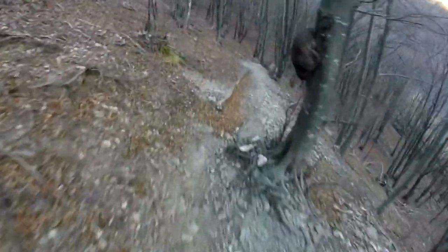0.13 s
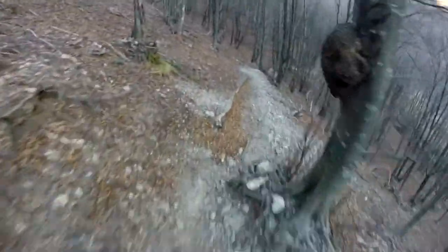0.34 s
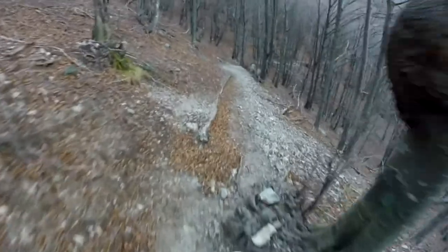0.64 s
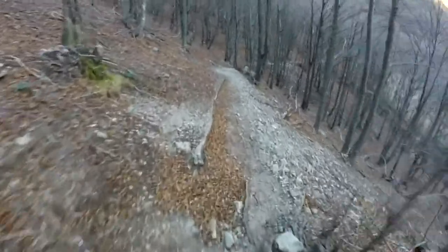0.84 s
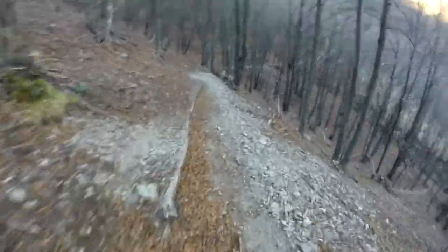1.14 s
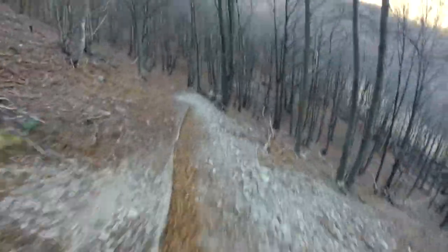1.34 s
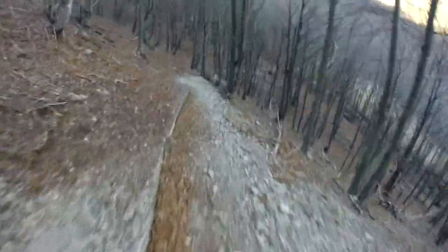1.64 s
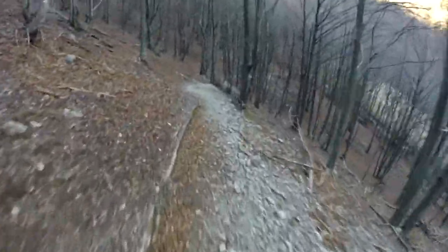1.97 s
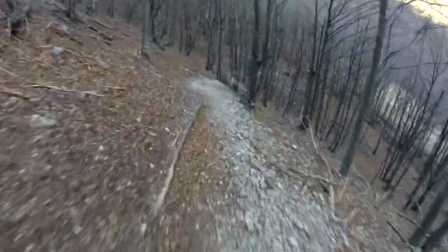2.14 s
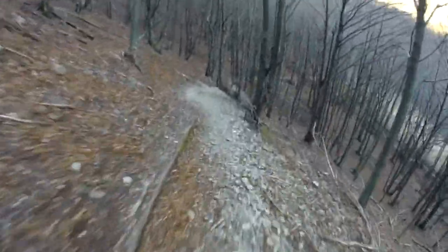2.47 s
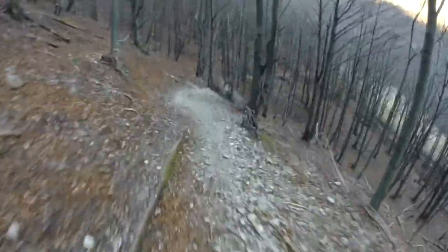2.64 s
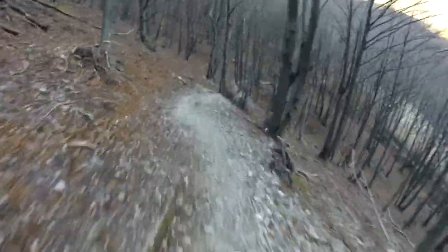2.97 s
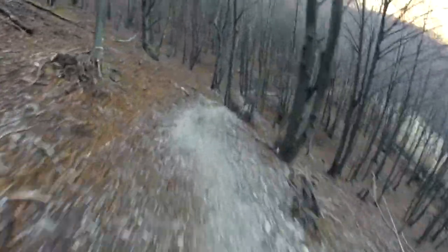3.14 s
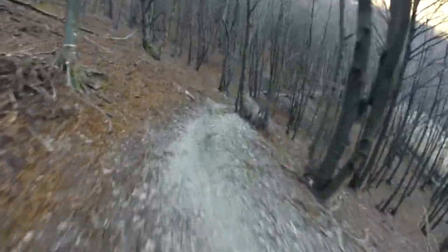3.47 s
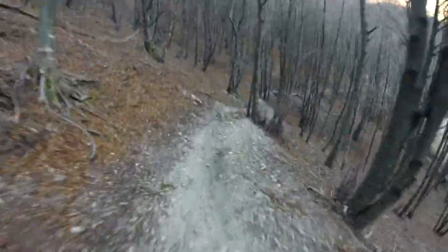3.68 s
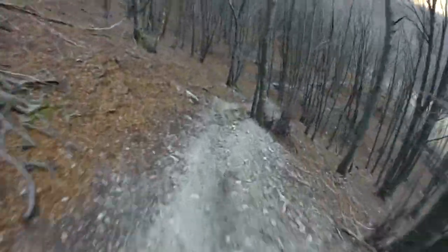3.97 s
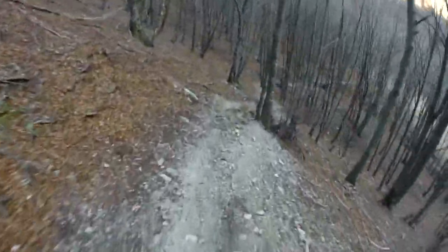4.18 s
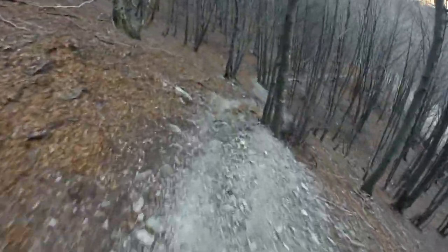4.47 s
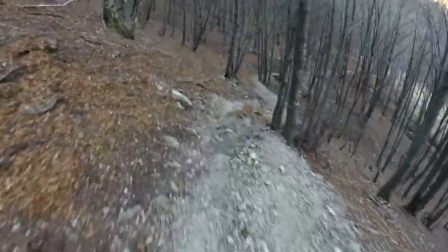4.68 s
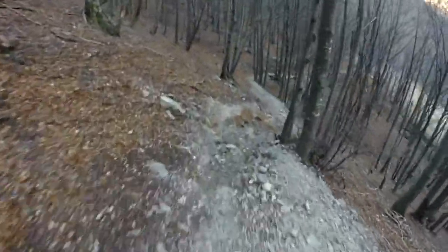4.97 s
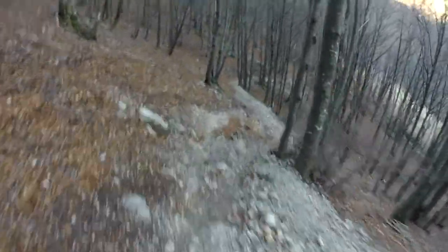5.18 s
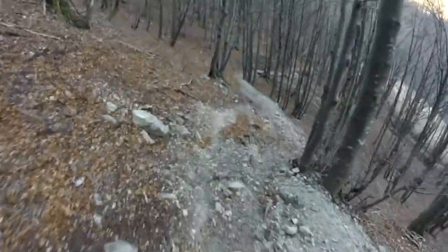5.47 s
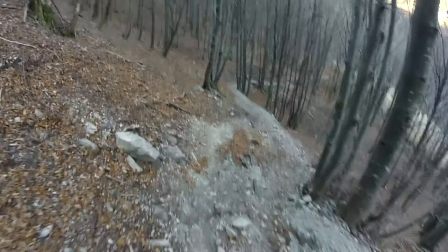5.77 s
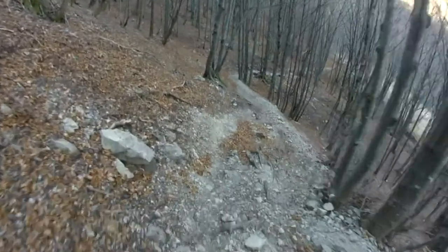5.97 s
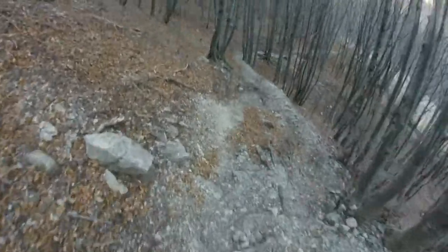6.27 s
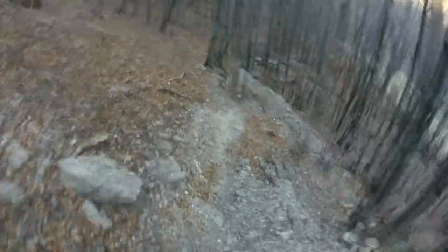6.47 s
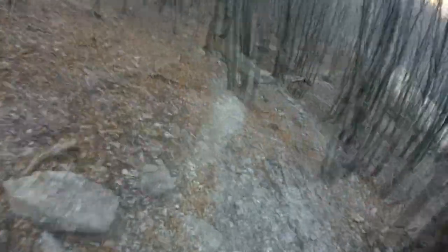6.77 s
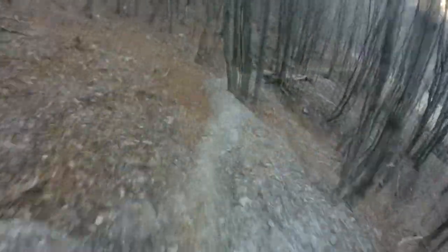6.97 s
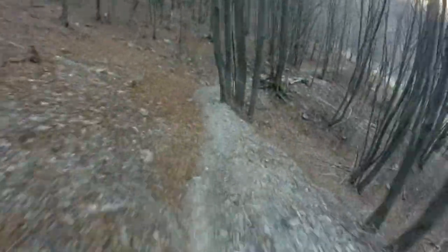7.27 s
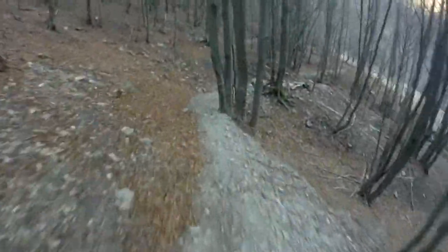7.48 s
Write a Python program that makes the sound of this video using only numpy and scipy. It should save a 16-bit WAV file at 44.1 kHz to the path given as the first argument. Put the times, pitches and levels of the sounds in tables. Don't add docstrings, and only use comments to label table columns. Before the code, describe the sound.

Low, throbbing wobble from a shaking camera mount runs throughout, with sudden heavy bumps. Over it, irregular dry clacks, short chattering knocks of stones and chain, and tiny metallic-bright ticks sound very close and boxy inside a plastic housing. Tyres hiss faintly on grit outdoors, with muffled air. A hard wheel landing hits near four seconds; after six it becomes sparser, then bumps return at the end.

```python
import sys
import numpy as np
from scipy import signal
from scipy.fft import rfft, irfft, next_fast_len
from scipy.io import wavfile
from scipy.ndimage import map_coordinates

SR = 44100
rng = np.random.default_rng(int(sys.argv[2]) if len(sys.argv) > 2 else 0)


def ratio_of_db(decibels):
    return 10 ** (np.asarray(decibels, float) / 20)


def digitize_waveform(pressure):
    field = np.atleast_2d(pressure).T
    bounded = np.clip(field, -1, 1)
    quanta = np.round(bounded * 32767).astype(np.int16)
    wavfile.write(sys.argv[1], SR, quanta)


N = 336042

# (time [s], level [dB])
ROUGHNESS = [(0.0, 2), (0.36, -1), (1.0, 1), (1.29, 4), (1.5, 2.5), (2.0, -1.5), (2.33, 0), (2.6, 4),
             (3.2, 1), (3.46, 1.5), (3.86, 3.5), (4.01, 0), (4.9, 0), (5.28, 2.5), (5.56, -4), (5.86, -1),
             (6.68, -6), (7.62, -1.5)]


def unit(x):
    return x / np.sqrt(np.mean(x ** 2) + 1e-20)


def curves(rows):
    s, *cols = np.transpose(rows)
    return [np.interp(np.arange(N) / SR, s, c) for c in cols]


def wobble(rate):
    knots = rng.standard_normal(int(N * rate / SR) + 4)
    return map_coordinates(knots, [np.arange(N) * rate / SR])


def swells(rows):
    t = np.arange(N) / SR
    return sum(db * np.exp(-((t - s) / max(length, 0.01)) ** 2) for s, db, length in rows)


def filtered(x, response):
    m = next_fast_len(len(x) + 8192)
    spectrum = rfft(x, m) * response(np.fft.rfftfreq(m, 1 / SR))
    return irfft(spectrum, m)[:len(x)]


def coloured(x, points):
    hz, db = np.transpose(points)
    return unit(filtered(x, lambda f: ratio_of_db(np.interp(np.log(f + 1), np.log(hz + 1), db))))


def add(track, s, sound):
    part = track[round(s * SR):][:len(sound)]
    part += sound[:len(part)]


def upper_fall(f):
    return 1 / (1 + (f / 4500) ** 10)


def housing(f):
    # (frequency [Hz], width [Hz], level [dB])
    resonances = [(1320, 300, -32), (1380, 560, -26.5), (1914, 285, 2), (2650, 333, 0), (2924, 170, 3.5),
                  (3695, 290, -2), (4160, 710, -10)]
    total = 0
    for k, (hz, width, db) in enumerate(resonances):
        total = total + (-1) ** k * ratio_of_db(db) * 1j * f * width / (hz * hz - f * f + 1j * f * width)
    return total * upper_fall(f)


def ring(modes, t, attack, scatter_db):
    tones = 0
    for k, (hz, db, t60) in enumerate(modes):
        strength = ratio_of_db(db + scatter_db * rng.standard_normal() - 60 * t / t60)
        tones = tones + (-1) ** k * strength * np.sin(2 * np.pi * hz * t)
    return tones * (1 - np.exp(-t / attack))


def grit(rate, spread_db):
    sizes = ratio_of_db(spread_db * np.minimum(rng.exponential(size=N), 2.5))
    hits = (rng.random(N) < rate / SR) * sizes
    return 1 + np.convolve(hits, np.exp(-np.arange(200) / 45))[:N]


def electronics():
    # (frequency [Hz], level [dB rms])
    circuit_tones = [(12662, -95), (14761, -97), (14998, -96)]
    # (frequency [Hz], level [dB per Hz])
    floor_colour = [(3500, -22), (6000, -6), (8350, -6.5), (13400, -7.5), (14700, -9), (15700, -12),
                    (15900, -50)]
    t = np.arange(N) / SR
    out = ratio_of_db(-77.5) * coloured(rng.standard_normal(N), floor_colour)
    for hz, db in circuit_tones:
        out += np.sqrt(2) * ratio_of_db(db) * np.sin(2 * np.pi * hz * t + 1.5 * wobble(12))
    return out


def ride():
    # (time [s], hiss rise [dB], length [s])
    skids = [
        (1.32, 10, .09),
        (2.61, 1, 0.22),
        (2.95, 4, 0.064),
        (5.16, 4.5, 0.042),
    ]
    # (time [s], rise [dB], length [s])
    gusts = [
        (1.44, 1, 0.088),
        (5.28, 3.5, 0.063),
        (5.76, 3.5, 0.098),
    ]
    # (frequency [Hz], level [dB per Hz])
    hiss_colour = [(2500, -16.5), (4300, -4.5), (5700, -4), (6300, -9.5), (7150, -6.5), (7800, -12.5),
                   (10700, -16.5), (14000, -24), (15700, -28), (15900, -70)]
    # (frequency [Hz], level [dB per Hz])
    air_colour = [(71, -9.5), (120, -2.5), (156, -8.5), (321, -8.5), (1340, -18.5), (1500, -16),
                  (1950, -60), (3300, -120)]
    rough_db, = curves(ROUGHNESS)
    bumpy = wobble(16)
    rattle_db = -58 + rough_db + 1.8 * bumpy + 1.57 * wobble(60)
    hiss_db = -68 + 0.6 * rough_db + swells(skids) + 0.72 * bumpy + 1.3 * wobble(40)
    air_db = -58.5 + 0.51 * rough_db + swells(gusts) + 0.61 * bumpy + 1.64 * wobble(25)
    rattle = unit(filtered(grit(rate=190, spread_db=4.0) * rng.standard_normal(N), housing))
    hiss = coloured(grit(rate=130, spread_db=0.0) * rng.standard_normal(N), hiss_colour)
    air = coloured(rng.standard_normal(N), air_colour)
    return ratio_of_db(rattle_db) * rattle + ratio_of_db(hiss_db) * hiss + ratio_of_db(air_db) * air


def latch_ticks():
    # (time [s], peak level [dB])
    tick_events = [(0.2143, -46), (0.61, -40.5), (0.7572, -42), (0.997, -39.5), (1.1623, -40.5),
                   (1.2441, -44), (1.3457, -45), (1.5783, -39.5), (1.6424, -40.5), (2.0752, -45),
                   (2.4767, -41.5), (2.5446, -49), (2.646, -44), (2.7544, -38.5), (3.017, -41),
                   (3.9986, -39.5), (4.3184, -42), (4.5533, -46), (4.8045, -50), (5.0674, -44.5),
                   (5.222, -40.5), (5.3073, -41), (5.7828, -38.5), (6.0823, -48), (6.5412, -40.5),
                   (7.004, -50), (7.0723, -48), (7.2993, -44.5), (7.3588, -42.5), (7.4088, -49.5)]
    # (frequency [Hz], level [dB], t60 [s])
    latch_modes = [(3460, -5, 0.0062), (7140, -4, 0.0036), (9740, 0.5, 0.0025), (12000, -12, 0.0032),
                   (15300, -4, 0.0026)]
    lead_s, bounce_s = 0.0008, 0.0021
    knock_hz, knock_t60_s = 745, 0.014
    out, t = np.zeros(N), np.arange(900) / SR
    for s, db in tick_events:
        add(out, s + lead_s, ratio_of_db(db + 1.5) * ring(latch_modes, t, attack=0.0001, scatter_db=0.5))
        add(out, s + bounce_s, ratio_of_db(db - 12.5) * ring(latch_modes, t, attack=0.0001, scatter_db=9))
        knock_db = -40.5 + 0.58 * (db + 43)
        knock = ratio_of_db(knock_db - 60 * t / knock_t60_s) * np.sin(2 * np.pi * knock_hz * t)
        add(out, s + lead_s, knock)
    return out


def jolt(db, t60, centre_hz, edge, thud, slam_colour, thud_colour):
    t = np.arange(8000) / SR
    noise = rng.standard_normal((2, len(t)))
    contacts = noise[0] * (rng.random(len(t)) < 700 / SR)
    contacts[40] = 1.62
    drive = unit(contacts) + 0.62 * noise[1]

    def lean(f):
        return housing(f) * (0.4 + 1 / (1 + ((f - centre_hz) / 330) ** 2))

    edge_db, edge_loss = edge
    thud_db, thud_loss = thud
    above_db = db + 35
    sound = unit(filtered(drive, lean))
    sound += ratio_of_db(edge_db - edge_loss * above_db) * coloured(drive, slam_colour)
    sound += ratio_of_db(thud_db - thud_loss * above_db) * coloured(drive, thud_colour)
    return ratio_of_db(db - 9 - 60 * t / max(t60, 0.01)) * (1 - np.exp(-t / 0.001)) * sound


def jolts():
    # (time [s], peak level [dB], t60 [s])
    stones = [(0.2739, -40.5, 0.15), (0.6711, -40, 0.068), (0.8196, -33.5, .042), (0.955, -40, 0.074),
              (0.987, -34.5, 0.076), (1.08, -39, .1), (1.1375, -37, 0.068), (1.756, -29.5, 0.054),
              (2.1305, -37, 0.05), (2.9964, -35, 0.096), (3.077, -24.5, 0.024), (3.586, -34, 0.057),
              (3.7294, -42, 0.095), (4.0781, -37.5, 0.049), (4.2342, -38, .07), (4.4896, -38.5, 0.22),
              (4.658, -37, 0.15), (4.797, -35, 0.079), (4.8898, -36, 0.074), (5.1371, -30, 0.14),
              (6.4185, -37, 0.089), (7.025, -43, 0.085), (7.105, -42, 0.053), (7.565, -41, .05)]
    # (time [s], peak level [dB], t60 [s], centre [Hz])
    slaps = [(1.1655, -27, 0.03, 2800), (1.1872, -19, 0.043, 1800), (1.7853, -37.5, .061, 2900),
             (1.839, -40, .06, 2600), (2.382, -37, 0.049, 2930), (2.6648, -37, 0.16, 2905),
             (2.9319, -40.5, 0.32, 2650), (3.709, -40, 0.061, 2750), (3.7903, -38, .07, 2880),
             (3.7949, -28, .1, 3250), (3.8333, -39, 0.055, 3040), (3.973, -37, 0.076, 2790),
             (4.9262, -40, .1, 2700), (4.9665, -29.5, 0.079, 2940), (4.9916, -31.5, 0.064, 2724),
             (5.145, -20, .044, 2670), (5.1792, -38, 0.062, 2935), (5.347, -35.5, 0.06, 3050),
             (5.3916, -33.5, .048, 3130), (5.657, -37, 0.055, 2910), (5.6694, -34, 0.057, 2980),
             (6.3858, -40, 0.2, 3030), (6.765, -45, 0.24, 2660), (6.8577, -34, 0.064, 2500),
             (7.1726, -30.5, 0.087, 2942), (7.1825, -50, 0.093, 2900), (7.233, -29.5, 0.045, 2450),
             (7.5086, -36, 0.037, 2520), (7.612, -33.5, 0.042, 2630)]
    # (time [s], peak level [dB], t60 [s], centre [Hz])
    landings = [
        (0.066, -30.5, 0.038, 1930),
        (3.244, -37.5, .046, 2130),
        (3.902, -20, 0.095, 2570),
        (5.7077, -34, 0.19, 1740),
        (6.55, -28, .07, 2920),
        (6.5575, -28.5, 0.051, 1840),
        (6.8244, -35, 0.16, 2270),
    ]
    # (frequency [Hz], level [dB per Hz])
    slam_colour = [(4300, 1.5), (5600, 1.5), (7400, -8.5), (8500, -27), (12000, -30), (15500, -40),
                   (16000, -80)]
    # (frequency [Hz], level [dB per Hz])
    thud_colour = [(600, -35), (900, -4.5), (1230, -2.5), (1500, -4), (1800, -41)]
    stones = [(*row, 2020) for row in stones]
    # (level [dB], loss [dB per dB of jolt])
    kinds = [(stones, (-17, 0), (-18.5, 0.9)),
             (slaps, (-16, 1.12), (-23, 0)),
             (landings, (-10, 0.2), (-19.5, -0.2))]
    out = np.zeros(N)
    for rows, edge, thud in kinds:
        for s, db, t60, centre_hz in rows:
            add(out, s - 0.001, jolt(db, t60, centre_hz, edge, thud, slam_colour, thud_colour))
    return out


def housing_clacks():
    # (time [s], peak level [dB], brightness [dB])
    clack_events = [(1.1936, -17.5, -26.5), (1.395, -21, -38), (1.6155, -19, -26), (1.8578, -22.5, -32.5),
                    (2.362, -19, -31.5), (2.607, -18, -25.5), (2.6956, -18.5, -26), (2.766, -32.5, -32),
                    (3.1253, -20, -31), (3.6584, -17.5, -28.5), (4.0174, -19.5, -29), (4.2041, -28.5, -47),
                    (4.337, -22.5, -37), (5.1465, -17, -26), (5.2802, -31, -36), (5.7368, -17.5, -31),
                    (6.1914, -24, -26.5), (6.836, -28, -30)]
    # (frequency [Hz], level [dB], t60 [s])
    low_modes = [(357, -26.5, 0.039), (1960, -8, 0.0032), (2650, 3.5, 0.0037), (3220, -24, 0.0057),
                 (3743, -11, 0.0065), (4100, -15.5, 0.0059)]
    # (frequency [Hz], level [dB], t60 [s])
    high_modes = [(5230, -9, 0.0083), (6570, -9.5, 0.013), (7380, -7, 0.012), (8170, -16, 0.0068),
                  (9500, -16, .005), (11140, -15, 0.0062), (14003, -22, .005)]
    rebound_s, rise_s = 0.00113, 0.0007
    body, bright, t = np.zeros(N), np.zeros(N), np.arange(2000) / SR
    for s, db, top_db in clack_events:
        first = s - 0.0003
        second = first + rebound_s
        level = ratio_of_db(db + 4.5)
        top = ratio_of_db(db + top_db + 9.5) * ring(high_modes, t, attack=0.00027, scatter_db=4.0)
        buzz = ratio_of_db(-19.5 - 60 * t / 0.033) * unit(filtered(rng.standard_normal(len(t)), housing))
        add(body, first, level * ring(low_modes, t, rise_s, scatter_db=2.0))
        add(body, second, level * (ring(low_modes, t, rise_s / 2, scatter_db=2.0) + buzz))
        add(bright, first, top)
        add(bright, second, 0.82 * top)
    return filtered(body, upper_fall) + bright


def mount_release(f):
    hz, width_hz, lead_s = 84.5, 62, 0.0024
    step = SR / (2 * np.pi) * 1j * f / (f * f + 9.4 ** 2)
    soft = hz * hz / (hz * hz - f * f + 1j * f * width_hz)
    return step * soft * np.exp(2j * np.pi * f * lead_s)


def mount_shaking():
    # (time [s], drop [dB])
    bumps = [(0.122, -9.5), (0.743, -19), (1.052, -10), (1.103, -8.5), (1.214, -11), (1.32, -5.5),
             (1.46, -13), (1.566, -7.5), (1.631, -6.5), (2.054, -15.5), (2.466, -15.5), (2.621, -9.5),
             (2.718, -6), (2.873, -13), (2.948, -12.5), (3.074, -13.5), (3.256, -13.5), (3.384, -13),
             (4.284, -17), (4.627, -7), (5.044, -10), (5.164, -28), (5.299, -6.5), (5.365, -19.5),
             (6.882, -12), (7.124, -12.5), (7.288, -14), (7.34, -21), (7.401, -16), (7.509, -36)]
    # (time [s], sway [dB], sway rate [Hz])
    shake = [(0.0, -24, 16.8), (0.4, -31.5, 17), (0.74, -25, 20), (0.9, -29, 16.8), (1.2, -28, 17),
             (1.7, -23.5, 19.5), (1.88, -23.5, 19.5), (2.2, -34.5, 20.5), (2.5, -24.5, 25),
             (3.2, -27, 19.5), (3.8, -27, 20), (4.4, -25, 18.2), (4.75, -32, 26), (5.35, -23.5, 21),
             (5.9, -34.5, 23.5), (6.3, -35.5, 28), (6.8, -31, 17), (7.62, -21.5, 18)]
    # (time [s], sway change [dB], length [s])
    heaves = [(.45, -2, 0.035), (.66, 2.5, 0.059), (.87, -5.5, 0.046), (1.72, -11, 0.039), (1.85, 2, 0),
              (1.97, -6, 0.025), (2.2, 4, 0.022), (3.61, -5.5, 0.031), (3.86, 2.5, 0.026),
              (4.12, -4, 0.033), (5.62, -5, 0.056), (5.75, 2, 0.047), (5.9, -4.5, 0.03), (5.99, 6, 0.035),
              (6.07, -4, 0.025), (6.5, -1, 0.052), (6.71, 5, 0.062), (6.81, -9, .03), (7.0, 4, 0.081)]
    # (frequency [Hz], level [dB per Hz])
    sway_colour = [(2.4, -33), (4.0, -2.5), (27, 16.5), (36, -9), (60, -7), (78, -32), (130, -120)]
    # (frequency [Hz], level [dB per Hz])
    quiver_colour = [(30, -120), (45, 5), (60, -8.5), (88, -1), (104, -3.5), (125, -22), (200, -46),
                     (300, -120)]

    kick_lead_s, kick_length_s = 0.0037, 0.024
    kicks = [(s - kick_lead_s, 3.5 + 0.12 * (db + 1), kick_length_s) for s, db in bumps]
    sway_db, sway_hz = curves(shake)
    sway_db = sway_db + 1.84 * swells(heaves) + swells(kicks)
    quiver_db = -48 + 0.66 * (sway_db - sway_db.mean()) + 0.56 * curves(ROUGHNESS)[0]

    when, drop_db = np.transpose(bumps)
    at = np.round(when * SR).astype(int)
    turns = np.cumsum(sway_hz * ratio_of_db(2.5 * wobble(14))) / SR
    turns += np.interp(np.arange(N), at, np.floor(turns[at]) + 0.5 - turns[at])
    angle = 2 * np.pi * turns
    skew = 0.29 + 0.2 * wobble(18)
    swing = np.sqrt(2) * ratio_of_db(0.79 * wobble(43)) * np.sin(angle - skew * np.sin(angle))
    swing += 0.46 * coloured(rng.standard_normal(N), sway_colour)
    quiver = ratio_of_db(1.6 * wobble(14)) * coloured(rng.standard_normal(N), quiver_colour)
    drops = np.zeros(N)
    drops[at] = ratio_of_db(drop_db)
    release = filtered(drops, mount_release)
    motion = ratio_of_db(sway_db - 1.5) * swing + ratio_of_db(quiver_db) * quiver + ratio_of_db(-9) * release
    return filtered(motion, lambda f: 1 / (1 + (f / 100.5) ** 12))


def scene():
    far = electronics() + ride()
    near = latch_ticks() + jolts() + housing_clacks() + mount_shaking()
    return (far + near)[None]


def roll_off(x):
    return signal.sosfilt(signal.butter(12, 17130, fs=SR, output="sos"), x)


def record(dry):
    top_hz = 16300
    mix = filtered(dry[0], lambda f: 1 / (1 + (f / top_hz) ** 40))[None]
    return roll_off(mix)


dry = scene()
out = record(dry)
digitize_waveform(out)
```